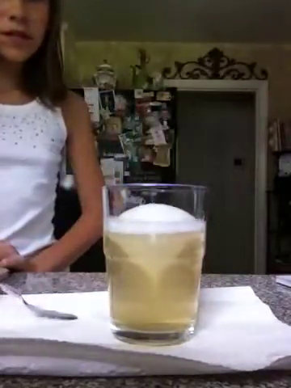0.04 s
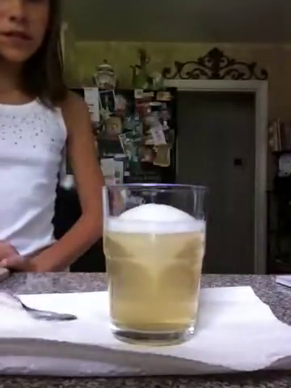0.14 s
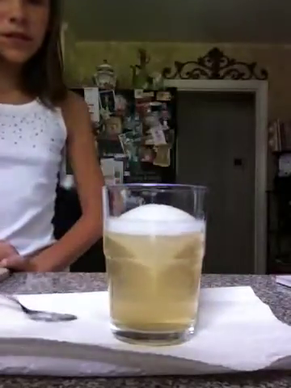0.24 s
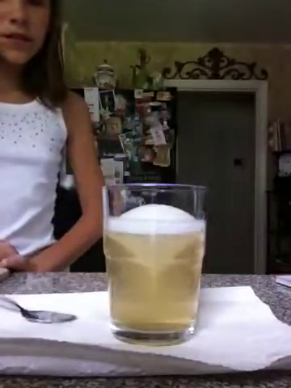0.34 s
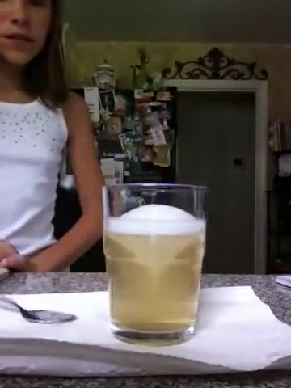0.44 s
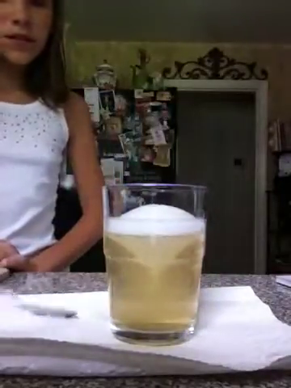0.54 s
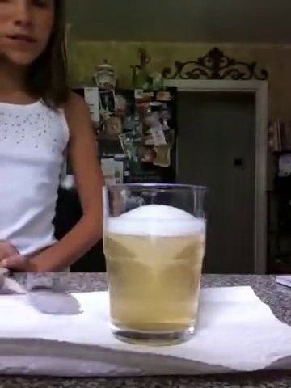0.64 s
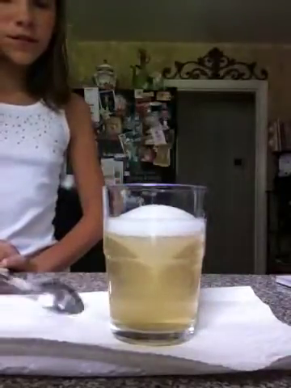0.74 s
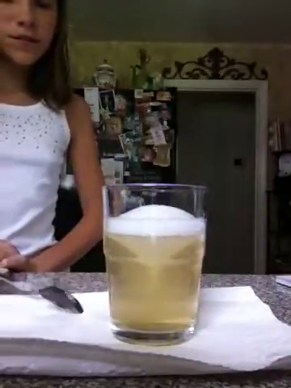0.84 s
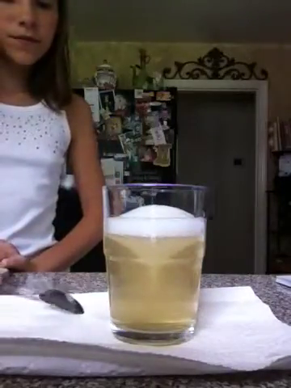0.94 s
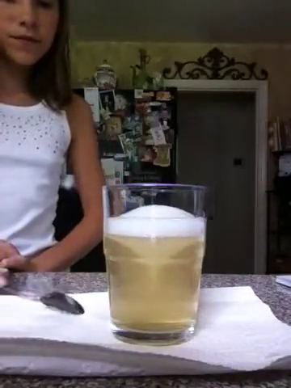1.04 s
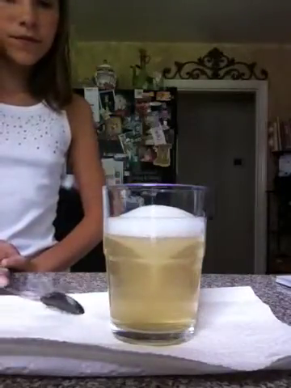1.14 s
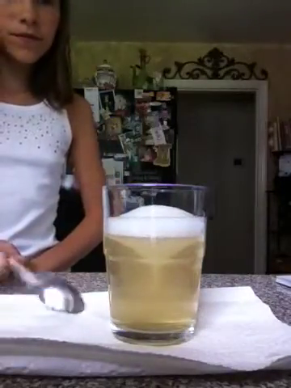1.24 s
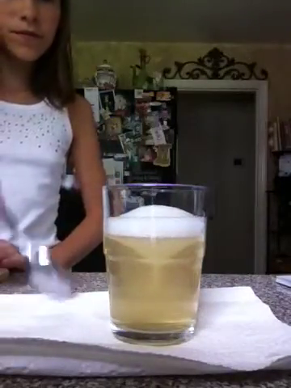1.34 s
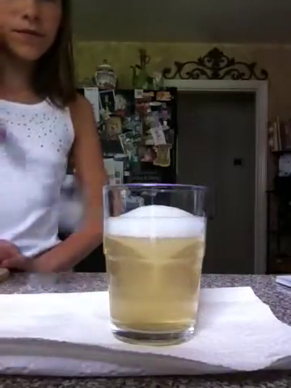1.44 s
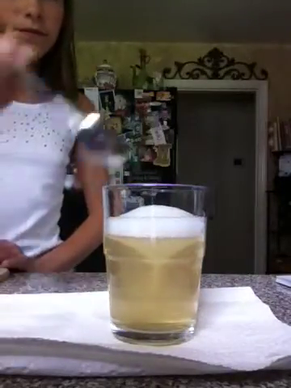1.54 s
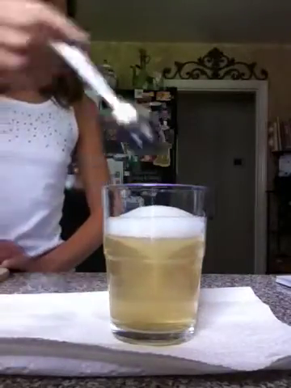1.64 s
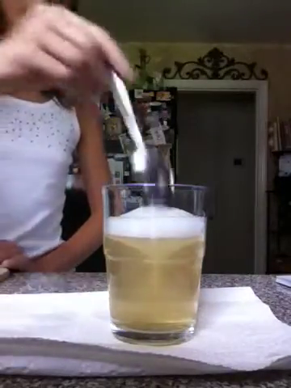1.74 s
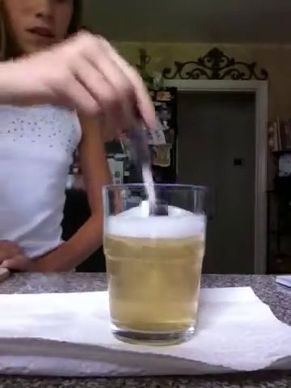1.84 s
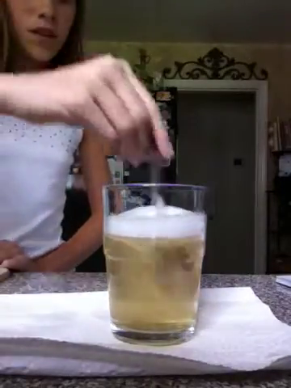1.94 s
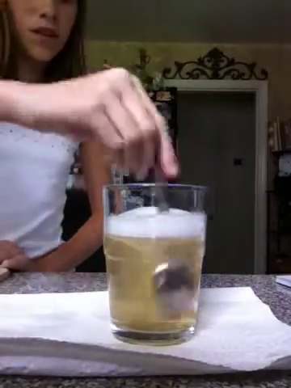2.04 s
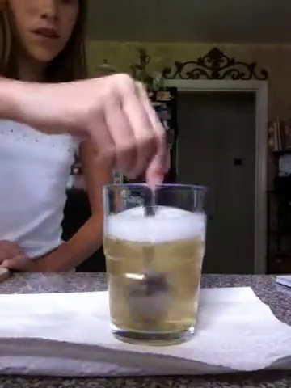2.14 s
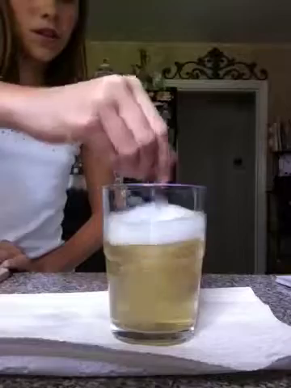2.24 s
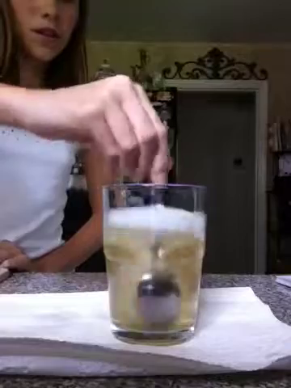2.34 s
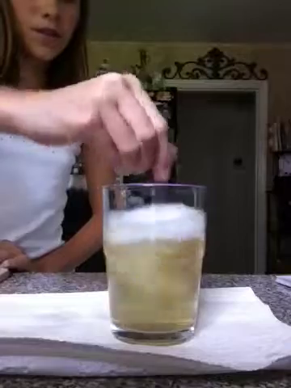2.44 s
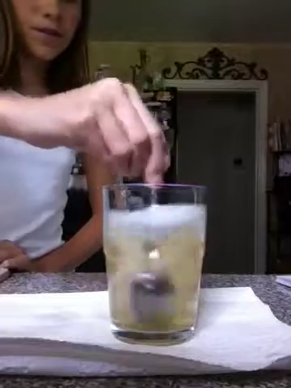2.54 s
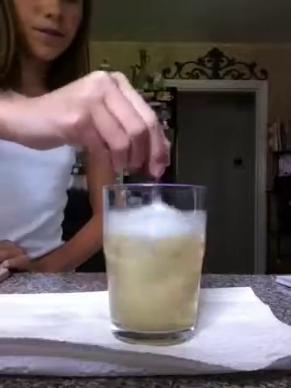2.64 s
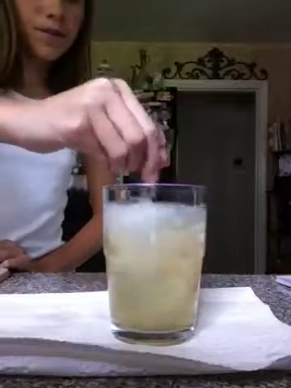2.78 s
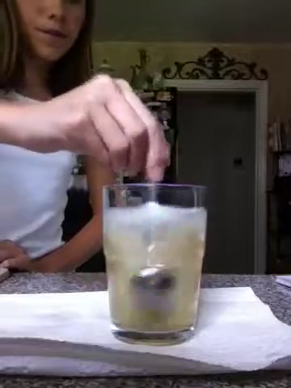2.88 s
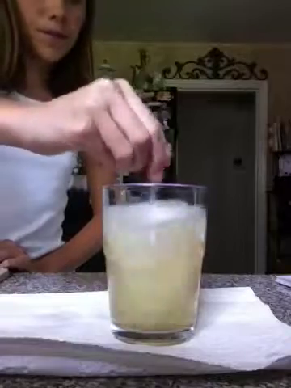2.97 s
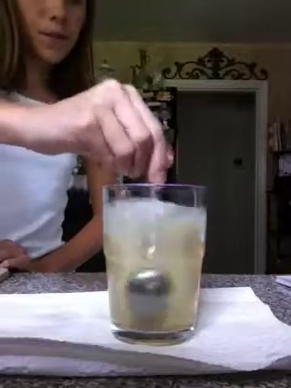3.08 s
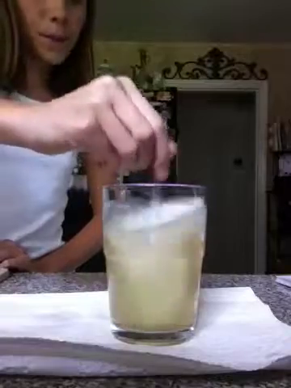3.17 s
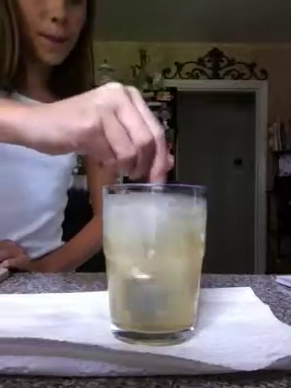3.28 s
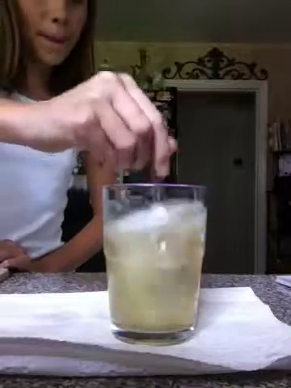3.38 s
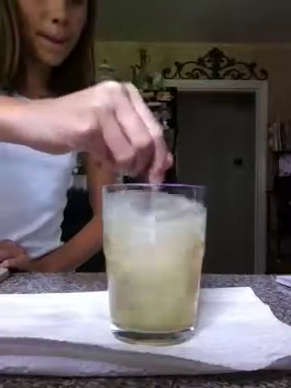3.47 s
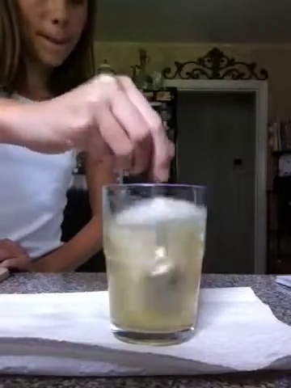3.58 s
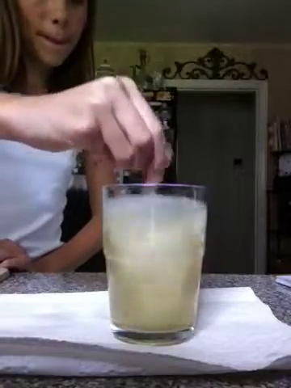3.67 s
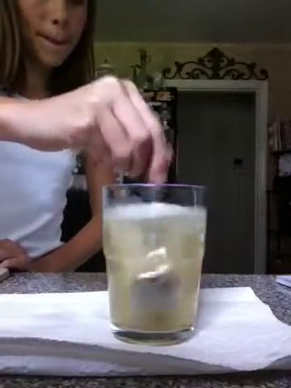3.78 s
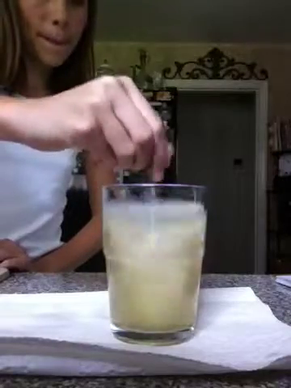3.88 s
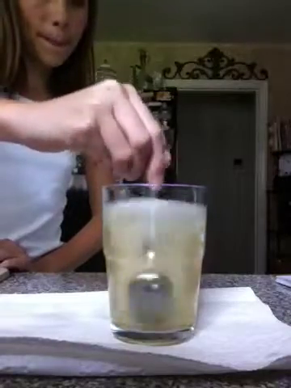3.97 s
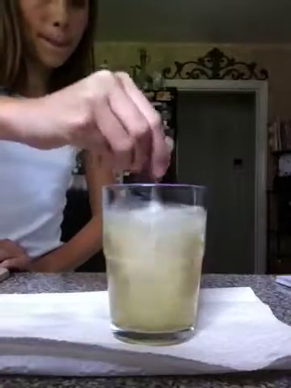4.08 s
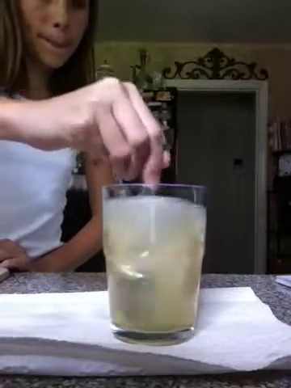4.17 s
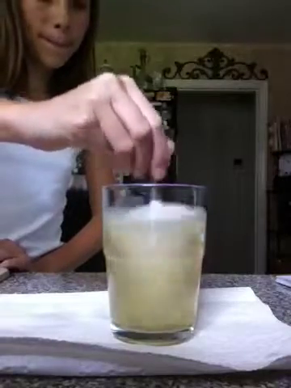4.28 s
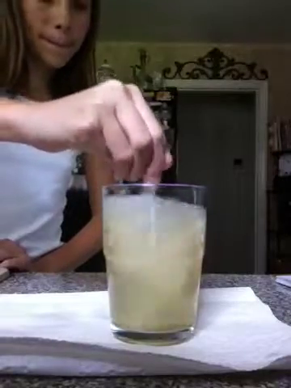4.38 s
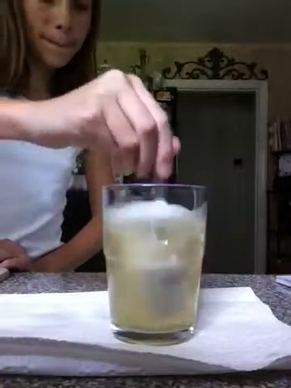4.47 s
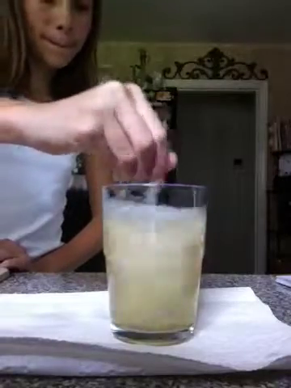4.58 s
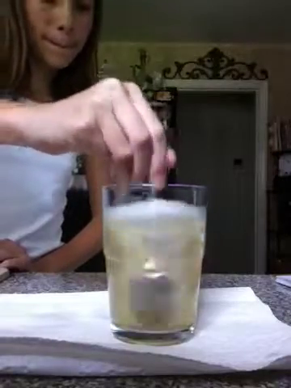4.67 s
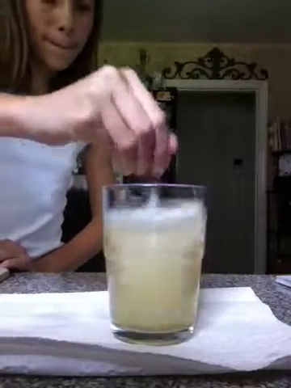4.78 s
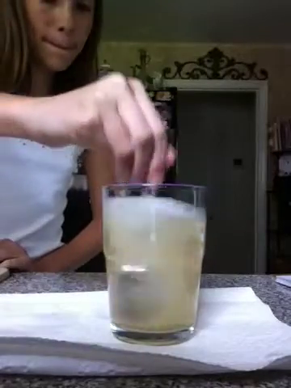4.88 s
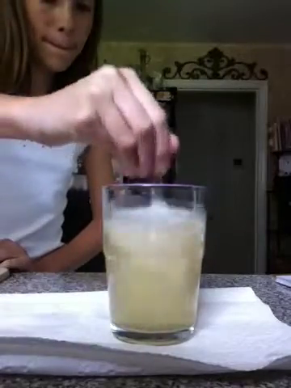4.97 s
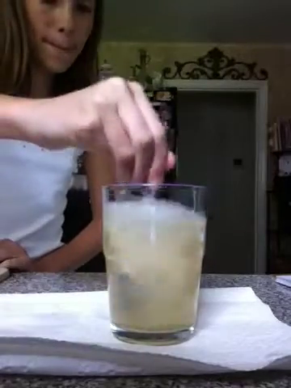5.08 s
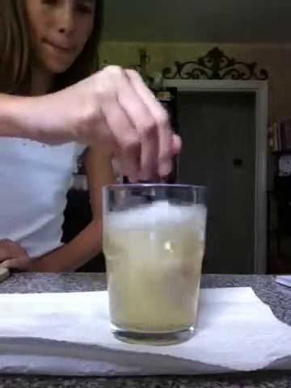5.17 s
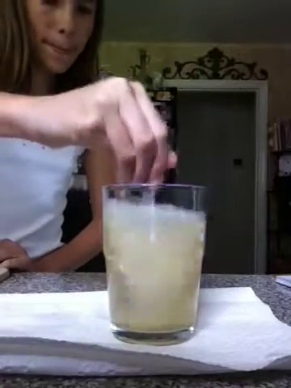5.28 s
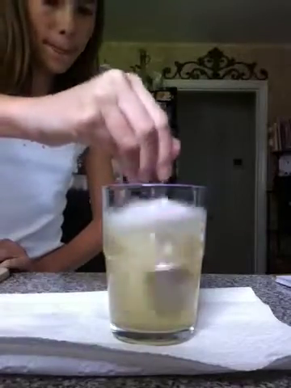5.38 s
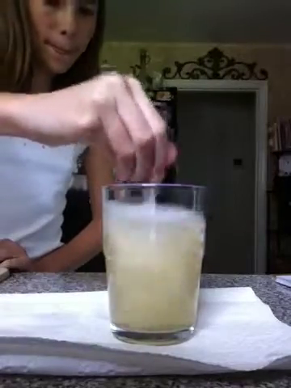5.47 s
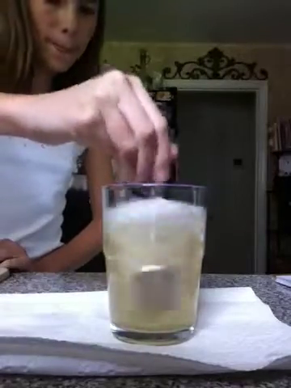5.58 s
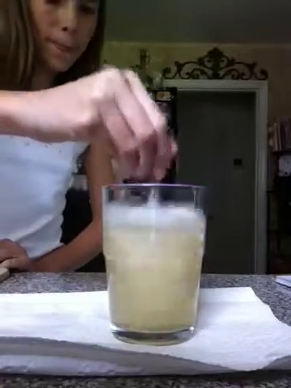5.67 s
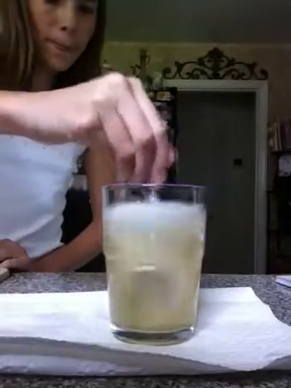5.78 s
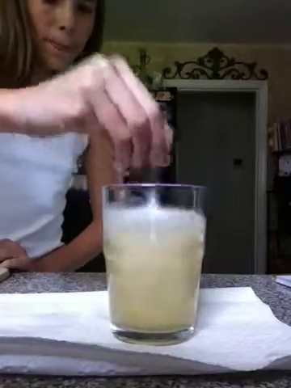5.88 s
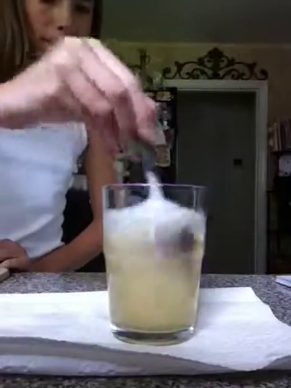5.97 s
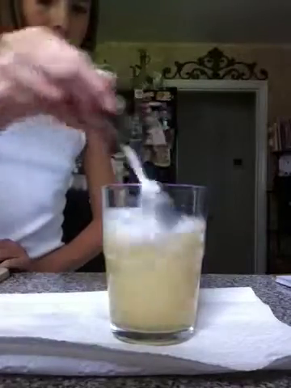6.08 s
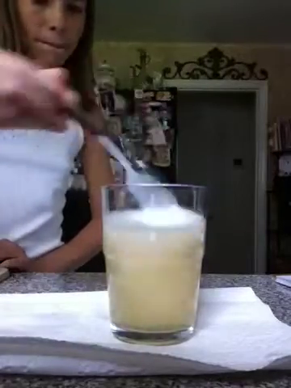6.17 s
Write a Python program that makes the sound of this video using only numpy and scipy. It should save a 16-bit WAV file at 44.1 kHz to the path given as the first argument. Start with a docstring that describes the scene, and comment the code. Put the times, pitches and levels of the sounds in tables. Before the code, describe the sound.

A metal spoon stirs a foamy drink in a glass, with quick clinks turning into duller clacks over soft swishing.

```python
"""Over a faint hum, a steel spoon scuffs off a paper towel, then stirs a foamy drink in a glass.
The first clinks ring freely; once bubbles are whipped in, the glass sounds lower and its ring is choked.
The spoon strikes the wall and, while it reaches deep, knocks on the bottom once a turn, jolting the
kitchen counter too; harder blows are shorter. The drink swishes and gulps, and a hard little room answers.
"""
import sys
import numpy as np
from scipy import signal
from scipy.fft import rfft, irfft, next_fast_len
from scipy.io import wavfile
from scipy.ndimage import uniform_filter1d, map_coordinates

SR = 44100
rng = np.random.default_rng(int(sys.argv[2]) if len(sys.argv) > 2 else 0)


def dump_mix(stems):
    """Bounce the given channels to the path in sys.argv[1] as a 16-bit WAV at rate SR."""
    frames = np.atleast_2d(stems).T  # one column per channel
    limited = np.clip(frames, -1, 1)  # hard clip at full scale
    pcm = np.round(limited * 32767).astype(np.int16)
    wavfile.write(sys.argv[1], SR, pcm)


N = 274257
MEDIUM_BLOW_DB = -35.5  # harder and softer blows are reckoned from this level


def amp(db):
    """Turn decibels into a factor to multiply a sound by."""
    return 10 ** (np.asarray(db) / 20)


def fade(t, fade_s):
    """Die away by 60 dB in fade_s seconds: this is what 'fade time' means below."""
    return amp(-60 * t / fade_s)


def unit(x):
    """Scale a sound to an average (rms) strength of 1."""
    return x / np.sqrt(np.mean(x ** 2) + 1e-20)


def along(points, hz):
    """Read between (frequency, value) points, with octaves evenly spaced."""
    freqs, values = np.transpose(points)
    return np.interp(np.log(hz + 1), np.log(freqs + 1), values)


def wobble(rate):
    """A smooth curve through `rate` random values a second."""
    values = rng.standard_normal(int(N * rate / SR) + 4)
    return map_coordinates(values, [np.arange(N) * rate / SR])


def filtered(x, response):
    """Turn each frequency of a sound up or down by the factor response(hz)."""
    size = next_fast_len(N + SR // 2)
    return irfft(rfft(x, size) * response(np.fft.rfftfreq(size, 1 / SR)), size)[:N]


def noise(spectrum):
    """Noise of strength 1, shaped by (frequency [Hz], level [dB]) points."""
    return unit(filtered(rng.standard_normal(N), lambda hz: amp(along(spectrum, hz))))


def add(track, s, sound):
    """Mix a sound into the track, starting at s seconds."""
    part = track[max(round(s * SR), 0):][:len(sound)]
    part += sound[:len(part)]


def background():
    """Steady room air and the slightly unsteady hum of an appliance."""
    # the soft rush of the room: (frequency [Hz], relative level [dB])
    air = [(25, -13), (60, -13), (90, -10), (145, -1.5), (235, -9.5), (315, -12), (390, -9.5), (570, -16),
           (680, -22.5), (1100, -26), (2500, -34.5), (6000, -38), (11000, -46.5), (16000, -48)]
    # the appliance's tones: (pitch [Hz], level [dB])
    hum_tones = [(151, -68.5), (240, -66)]
    t, hum = np.arange(N) / SR, np.zeros(N)
    for hz, db in hum_tones:
        strength = amp(db + 2.5 * wobble(5.5)) * np.sqrt(2)
        hum += strength * np.sin(2 * np.pi * hz * t + 0.6 * wobble(13))
    return amp(-57.5) * noise(air) + hum


def paper():
    """The spoon scuffs over the towel, catching on its fibres in tiny crisp ticks."""
    # the strokes: (peak time [s], time to rise 20 dB [s], time to fall 20 dB [s], level [dB])
    scuffs = [(.65, 0.069, 0.1, -67.5), (.735, 0.044, .09, -70), (1.4, .08, .05, -72)]
    # the hiss of rubbed paper: (frequency [Hz], relative level [dB])
    hiss = [(1000, -14), (3500, -8), (6000, -4), (8500, -0.5), (11000, -11), (14000, -11), (16000, -35)]
    t = np.arange(N) / SR
    strokes = sum(amp(db - 20 * np.maximum((s - t) / rise, (t - s) / fall))
                  for s, rise, fall, db in scuffs)
    catches = unit(amp(5.3 * wobble(260)))
    return strokes * catches * noise(hiss)


def liquid(count=1100):
    """Tiny bubbles pop in the swirl, over the soft swish of the foam."""
    # how loudly the drink swirls: (time [s], relative level [dB])
    swirl = [(1.8, -79.5), (1.92, -51), (2.0, -56.5), (2.15, -76), (2.6, -105), (3.2, -58), (4.2, -56.5),
             (5.6, -61.5), (6.22, -67.5)]
    bubbles, t = np.zeros(N), np.arange(SR // 80) / SR
    times, sizes = rng.uniform(0, N / SR, count), rng.exponential(size=count)
    pitches = np.clip(2000 * np.exp(0.65 * rng.standard_normal(count)), 400, 10000)
    for s, size, hz in zip(times, sizes, pitches):
        life = np.exp(-t * hz / 2) * (1 - np.exp(-t * hz))
        add(bubbles, s, amp(3 * min(size, 3)) * life * np.sin(2 * np.pi * hz * t))
    foam = noise([(200, -1), (500, 5.0), (1500, -1.5), (4000, -12.5), (10000, -29.5), (16000, -36)])
    foam *= amp(2.5 * wobble(30))
    swirl_db = np.interp(np.arange(N) / SR, *np.transpose(swirl))
    return amp(swirl_db - 12) * (unit(bubbles) / 2 + foam)


def contacts():
    """List every blow of the spoon: first those on the wall, then those on the bottom."""
    # blows on the wall, with relative levels:
    # (time [s], rim pitch [Hz], rim [dB], knock [dB], spoon's bowl [dB], spoon's edge over bowl [dB])
    wall_strikes = [(2.0936, 1413, -38.5, -52, -49.0, 5.5), (2.1671, 1410, -47, -61, -67.5, 4),
                    (2.2037, 1400, -54, -47.5, -45, -4.5), (2.24, 1445, -51, -51, -48, -17),
                    (2.2637, 1414, -34, -64, -42.5, -1), (2.3503, 1406, -33, -53, -28.5, 2.0),
                    (2.4673, 1415, -39.0, -65, -50, 1), (2.5572, 1403, -34, -46, -28.5, -13),
                    (2.7874, 1423, -43.5, -56.5, -52.5, 2), (2.8106, 1368, -37.5, -56, -43.5, -4),
                    (2.9467, 1280, -32, -58, -46.5, 12), (2.9877, 1234, -40.5, -55, -53, -3.5),
                    (3.035, 1340, -35, -41, -45, -1), (3.13, 1257, -36, -54.5, -46.5, 10.5),
                    (3.3115, 1304, -33, -62, -48.0, 12), (3.4906, 1297, -35.5, -56, -49.5, 9),
                    (3.5924, 1326, -45, -35.5, -33.5, -2), (3.6823, 1419, -40, -62, -45.5, -4.5),
                    (3.758, 1280, -29, -35.5, -34.5, -2.5), (3.8614, 1370, -40.5, -63, -51, 2),
                    (3.9245, 1270, -31.5, -38.5, -44, 6.5), (4.027, 1306, -38.5, -49, -37.0, -0.5),
                    (4.1193, 1307, -28, -38.5, -34.5, -3.0), (4.2071, 1360, -36, -49, -42, -0.5),
                    (4.2351, 1263, -33, -55, -38, -5.5), (4.2765, 1276, -33.5, -38, -45, 0.5),
                    (4.4504, 1265, -37, -41, -45.0, -2), (4.5701, 1264, -39.0, -43.5, -52, 7.5),
                    (4.6164, 1360, -46.0, -53, -55.5, -1), (4.8206, 1366, -21.5, -32, -32.5, -0.5),
                    (4.8398, 1336, -38.0, -32, -28, -13), (4.9815, 1315, -34.5, -43, -38.5, -2.0),
                    (5.1847, 1320, -26.5, -30.5, -21.5, -12), (5.207, 1274, -47, -35, -32.0, -1),
                    (5.288, 1286, -32.5, -60, -42.0, 1.5), (5.3557, 1346, -29.5, -39.5, -34.5, 0),
                    (5.37, 1270, -37.5, -35, -30, -25), (5.478, 1330, -44.0, -63, -55.5, 4.5),
                    (5.5324, 1396, -32, -34.5, -38.5, 0.5), (5.5485, 1280, -36, -35.5, -28, -14.5),
                    (5.5567, 1434, -38.5, -34.5, -28.5, -8.0), (5.722, 1364, -27.5, -27.5, -17.5, -9.5),
                    (5.7332, 1266, -38, -32, -31, -4), (5.903, 1396, -28.5, -29.5, -19, -8.0),
                    (6.0357, 1406, -38.5, -44.5, -41, -6)]
    # blows on the bottom, with relative levels:
    # (time [s], usual knock pitch [Hz], knock [dB], rim [dB], spoon's bowl [dB])
    bottom_knocks = [(2.425, 497, -37.5, -35, -35), (2.6214, 448, -32.5, -39, -38),
                     (2.682, 447, -37.5, -31.5, -38.5), (2.8317, 477, -42.5, -46.5, -57.0),
                     (3.0019, 490, -38, -39, -58), (3.176, 435, -38, -42, -48.5),
                     (3.3524, 475, -36, -43, -46), (3.5313, 620, -32.5, -36, -45),
                     (3.7016, 483, -37.5, -40.5, -44), (3.8846, 440, -34, -33.5, -44.5),
                     (4.0601, 413, -37, -35.5, -42.5), (4.243, 500, -36, -43, -50.0),
                     (4.431, 430, -36.5, -37, -45), (4.7702, 420, -39.5, -41.5, -43.5)]
    # a wall strike rocks the glass with a high knock; a bottom blow pushes a low one into the counter
    wall_knock_hz, wall_push_db, bottom_push_db = 679, -13.5, -4.5
    for s, rim_hz, rim_db, knock_db, bowl_db, edge_db in wall_strikes:
        yield s, rim_hz, rim_db, wall_knock_hz, knock_db, wall_push_db, bowl_db, edge_db
    for s, knock_hz, knock_db, rim_db, bowl_db in bottom_knocks:
        # the rim has the pitch of the wall strikes around it
        rim_hz = np.interp(s, *np.transpose(wall_strikes)[:2])
        yield s, rim_hz, rim_db, knock_hz, knock_db, bottom_push_db, bowl_db, 0


def ringing(s):
    """How freely the glass rings at time s, as whipped-in bubbles choke it."""
    # the ring as the froth builds: (time [s], rim's fade time [s], overtones' relative level [dB])
    freedom = [(2.1, 0.19, 3), (2.35, 0.13, -2.5), (2.56, 0.034, -9), (2.68, 0.029, -6.5),
               (3.0, 0.021, -11), (4.05, 0.016, -13), (4.13, 0.04, -17), (4.8, 0.012, -16.5),
               (4.98, 0.066, -20), (5.19, 0.016, -21.5), (5.9, 0.024, -21.5), (6.04, 0.028, -6)]
    times, fade_s, db = np.transpose(freedom)
    return np.interp(s, times, fade_s), np.interp(s, times, db)


def wall_level(s, rim_db, bowl_db):
    """The wall answers both the weight and the hardness of a blow, less so once the drink is frothy."""
    weight_db, hardness_db = rim_db - MEDIUM_BLOW_DB, bowl_db - MEDIUM_BLOW_DB
    _, overtones_db = ringing(s)
    return -32.5 + 0.38 * weight_db + 0.59 * hardness_db + 0.48 * overtones_db


def ring(tones, t, scatter_db):
    """An object's own tones die away, each with a random strength and sign for every blow."""
    hz, db, fade_s = np.transpose(tones)[:, :, None]
    size = amp(db + scatter_db * rng.standard_normal(hz.shape)) * rng.choice([-1, 1], hz.shape)
    return np.sum(size * fade(t, fade_s) * np.sin(2 * np.pi * hz * t), axis=0)


def unit_blow(x):
    """Scale a blow to an average (rms) strength of 1 over its first 8 ms."""
    return x / np.sqrt(np.mean(x[:SR // 125] ** 2) + 1e-20)


def struck(tones, skid_s, crack_db, scatter_db):
    """A push and the chatter of skidding steel set tones ringing, with a dry crack across their range."""
    t = np.arange(SR // 16) / SR
    skid = fade(t, skid_s) * (1 - np.exp(-28 * t / skid_s))
    force = 0.093 * rng.standard_normal(len(t)) * skid
    force[0] += 1  # the push
    # the point of contact and the sloshing drink shift the pitches a little
    shifted = np.array(tones) * [1 + 0.0042 * rng.standard_normal(), 1, 1]
    body = signal.fftconvolve(ring(shifted, t, scatter_db), force)[:len(t)]
    low_hz, high_hz = tones[0][0] * 0.88, min(tones[-1][0] * 1.05, SR / 2.2)
    band = signal.butter(3, [low_hz, high_hz], "band", fs=SR)
    crack = signal.lfilter(*band, rng.standard_normal(len(t)) * skid)
    return unit_blow(unit_blow(body) + amp(crack_db) * unit_blow(crack))


def brightened(tones, db_per_octave):
    """Make the higher tones louder, or softer if db_per_octave is below zero."""
    hz, db, fade_s = np.transpose(tones)
    return np.transpose([hz, db + db_per_octave * np.log2(hz / hz[0]), fade_s])


def clacks():
    """Each blow jolts the glass, the spoon and the counter into short rings that die quickly."""
    # the glass knocking on its base: (multiple of the knock pitch, relative level [dB], fade time [s])
    base = [(.78, -2, 0.028), (1, 7, 0.013), (1.25, 3.5, .015), (1.65, -6, 0.0021)]
    # the tones of five more parts, each (pitch [Hz], relative level [dB], fade time [s])
    counter = [(247, -10.5, 0.049), (356, -9, 0.14), (480, -0.5, 0.024)]  # the counter under the glass
    near_rim = [(985, 1, 0.018), (1138, 5, 0.0074), (1486, -2.5, 0.033), (1710, -5, 0.016),
                (1986, -6.5, 0.03), (2310, -19, 0.03)]  # brief neighbours of the rim's tone in the swirling drink
    wall = [(3144, -3.5, 0.025), (3450, 0.5, 0.018), (4264, 1.5, 0.0089), (4612, 6.5, 0.015),
            (5375, -9.5, 0.028), (5840, 2, 0.012)]  # the glass wall, muffled by the drink
    bowl = [(6540, 7.5, 0.012), (6690, -3, 0.012), (6910, -7.5, 0.03), (7170, -2, 0.018)]  # the bowl of the spoon
    tick = [(8230, 4.5, 0.015), (8900, 1.5, 0.0056), (9470, 5.5, 0.012), (9900, 1, 0.022),
            (10800, 2, 0.0016), (10670, 5, 0.0035), (11200, -9, 0.0053), (13300, -47, 0.0045)]  # high steel tones woken by a hard contact
    # the gentle first blows slide along the glass for longer: (time [s], skid length [factor])
    sliding = [(2.1, 1.2), (2.45, 1.5), (2.7, 1.0), (3.1, 1.3), (4.4, 0.89), (5.3, 0.84), (6.0, 0.63)]
    out = np.zeros(N)
    for s, _, rim_db, knock_hz, knock_db, push_db, bowl_db, edge_db in contacts():
        blow_db = max(rim_db, knock_db, bowl_db)
        skid_s = 0.016 * 2 ** ((MEDIUM_BLOW_DB - blow_db) / 9.5)  # 9.5 dB harder halves the skid
        skid_s *= np.interp(s, *np.transpose(sliding))
        knock = np.array(base) * [knock_hz * (1 + 0.051 * rng.standard_normal()), 1, 1]
        add(out, s, amp(knock_db + push_db) * struck(counter, skid_s, crack_db=-3.5, scatter_db=0.5))
        add(out, s, amp(knock_db - 2.95) * struck(knock, skid_s, crack_db=0, scatter_db=2))
        add(out, s, amp(rim_db - 7) * struck(near_rim, skid_s, crack_db=-6, scatter_db=3))
        # what a free glass puts into its overtones is missing from the dull clack of its wall
        _, overtones_db = ringing(s)
        clack_db = wall_level(s, rim_db, bowl_db) - 1.5 * amp(overtones_db)
        add(out, s, amp(clack_db) * struck(wall, skid_s, crack_db=-10, scatter_db=0.5))
        add(out, s, amp(bowl_db - 3.05) * struck(bowl, skid_s, crack_db=-7, scatter_db=3))
        # the thin edge of the spoon strikes brighter than the belly of its bowl
        edge = brightened(tick, db_per_octave=edge_db + 8)
        add(out, s, amp(bowl_db + edge_db - 2.7) * struck(edge, skid_s, crack_db=-4.5, scatter_db=2.5))
    return out


def singing():
    """The rim and its higher tones (overtones) ring on after each blow, until the drink stills them."""
    # overtones of the freely ringing glass: (pitch [Hz], relative level [dB], fade time [s])
    overtones = [(3300, -15, .13), (3548, -6, .19), (3880, -15, .16), (4630, -9, .085), (5455, -5.5, .09),
                 (6425, -13, .08), (7540, -18, .07)]
    # the rim's second tone, lasting even in froth: (free pitch [Hz], relative level [dB], fade time [s])
    second_rim = [(3524, -21, .34)]
    free_rim_hz = 1403
    out, t = np.zeros(N), np.arange(SR // 4) / SR
    for s, rim_hz, rim_db, _, _, _, bowl_db, _ in contacts():
        rim_fade_s, overtones_db = ringing(s)
        rim = np.sin(2 * np.pi * rim_hz * t) * fade(t, rim_fade_s) * (1 - np.exp(-t / 0.0023))
        add(out, s, amp(rim_db - 1.5) * unit_blow(rim))
        sag = np.array([(rim_hz / free_rim_hz) ** 0.8, 1, 1])  # higher tones sink with the rim's pitch
        wall_db = wall_level(s, rim_db, bowl_db)
        add(out, s, amp(wall_db + overtones_db) * ring(sag * overtones, t, scatter_db=-2))
        add(out, s, amp(wall_db) * ring(sag * second_rim, t, scatter_db=3))
    return out


def gulps():
    """Trapped air rings briefly and rises in pitch as it nears the surface."""
    # larger bubbles behind the spoon: (time [s], starting pitch [Hz], relative level [dB])
    bubbles = [(2.204, 1620, -44), (2.207, 850, -47.5), (2.239, 1660, -44), (2.992, 1730, -44.5),
               (3.132, 1530, -37), (3.195, 1945, -49), (3.55, 2080, -47.5)]
    out, t = np.zeros(N), np.arange(SR // 20) / SR
    for s, hz, db in bubbles:
        life = fade(t, 0.031) * (1 - np.exp(-t / 0.00019))
        add(out, s, amp(db + 8.5) * life * np.sin(2 * np.pi * hz * t * (1 + 4 * t)))
    return out


def echoes(x):
    """Near walls and the ceiling send back weak copies of the sound."""
    # one bounce each: (delay [s], level [dB])
    bounces = [(.0062, -23), (0.0102, -49), (0.021, -21.5)]
    out = np.zeros(N)
    for delay, db in bounces:
        add(out, delay, amp(db) * x)
    return out


def kitchen(x, wet_db):
    """The room stores the energy at each frequency and lets it leak away as a wash of noise."""
    # how long the room holds a sound: (frequency [Hz], fade time [s])
    fade_times = [(150, 0.84), (500, 0.18), (1500, 0.27), (4000, 0.32), (7000, 0.3), (10000, 0.27),
                  (15000, 0.45)]
    # the tone colour of the wash: (frequency [Hz], relative level [dB])
    colour = [(150, 0.5), (500, -5), (900, -2), (1350, -2.5), (2400, 4), (3400, -0.5), (4600, -3.5),
              (6600, -4.5), (8300, 1), (11000, -10), (13000, -2.5), (15000, -4.5)]
    delay = SR // 160
    hz, t, spectra = signal.stft(np.pad(x, (delay, 0)), SR, nperseg=256)
    # the room gathers sound from all sides of the glass, which blurs its pitches
    power = np.abs(uniform_filter1d(np.abs(spectra) ** 2, size=5, axis=0))
    kept = fade(t[1], along(fade_times, hz)) ** 2  # share of the energy left after each time step
    stored = np.array([signal.lfilter([1 - k], [1, -k], band) for k, band in zip(kept, power)])
    wash = signal.stft(rng.standard_normal(N + delay), SR, nperseg=256)[2]
    tail = wash / np.std(wash) * np.sqrt(stored) * amp(wet_db + along(colour, hz))[:, None]
    return signal.istft(tail, SR, nperseg=256)[1][:N]


def afterglow(x, wet_db, fade_s):
    """The room keeps the pitch of the glass's clear tones and makes them waver as they fade."""
    t = np.arange(SR // 2) / SR
    tail = rng.standard_normal(len(t)) * fade(t, fade_s) * (1 - np.exp(-t / 0.0036))
    return amp(wet_db) * signal.fftconvolve(x, tail / np.linalg.norm(tail))[:N]


def scene():
    """The glass stands close by; its sharp sounds and its clear tones spread through the kitchen."""
    sharp = clacks() + liquid() + gulps() + paper()
    tones = singing()
    direct = sharp + tones
    room = kitchen(sharp, wet_db=-10.5) + afterglow(tones, wet_db=-17, fade_s=0.35)
    return (direct + echoes(direct) + room + background())[None]


def record(dry):
    """The small microphone loses the deep bass and top treble, and cuts off steeply above top_hz."""
    # the microphone's tone colour: (frequency [Hz], level [dB])
    colour = [(30, 10), (80, -5.5), (130, -4.5), (200, 0), (12000, 0.5), (14000, -10), (15500, -15)]
    top_hz = 15300
    thin = signal.lfilter(*signal.butter(2, 130, "high", fs=SR), dry[0])
    return filtered(thin, lambda hz: amp(along(colour, hz)) / np.sqrt(1 + (hz / top_hz) ** 90))[None]


dry = scene()
out = record(dry)
dump_mix(out)
```